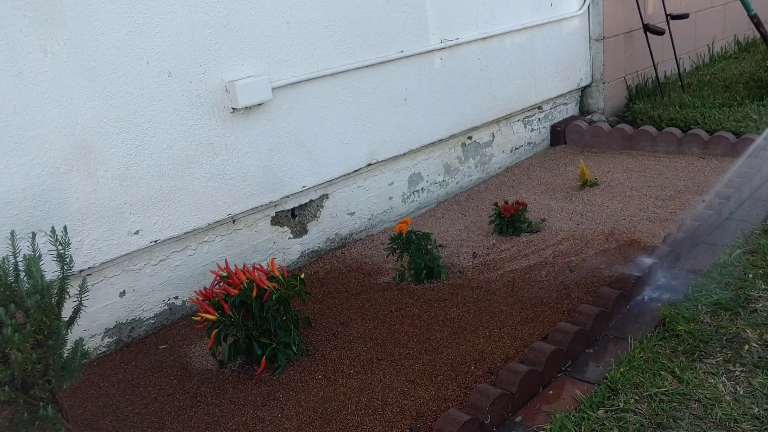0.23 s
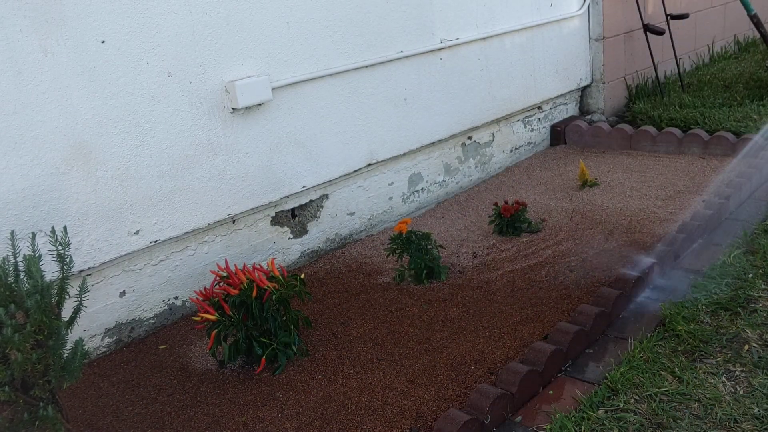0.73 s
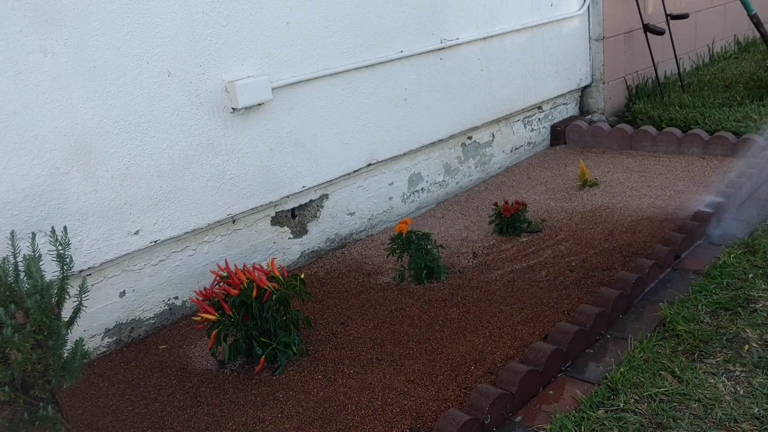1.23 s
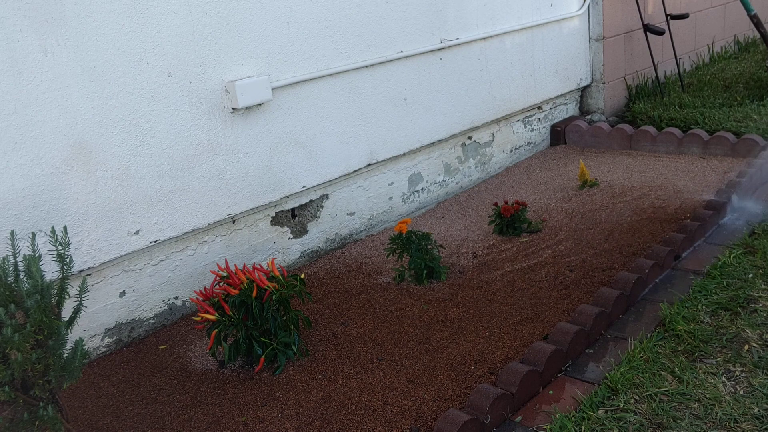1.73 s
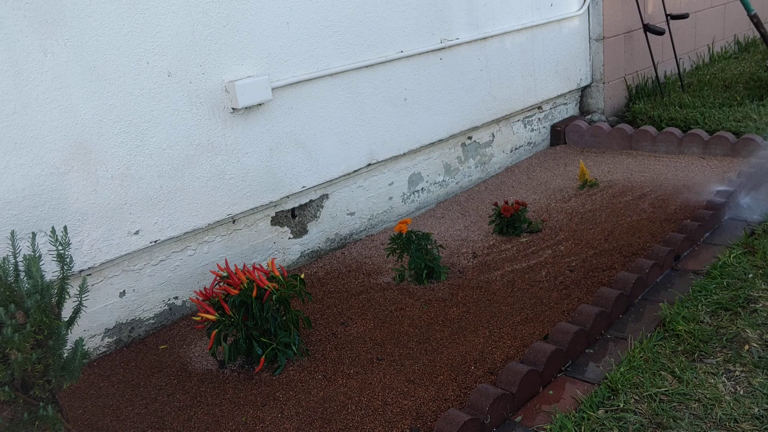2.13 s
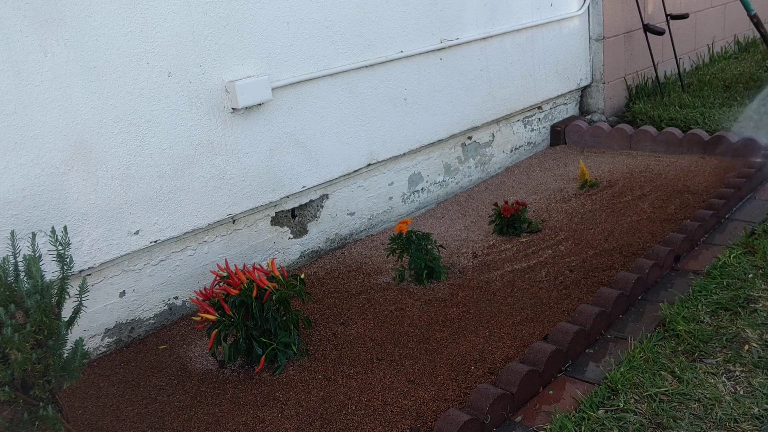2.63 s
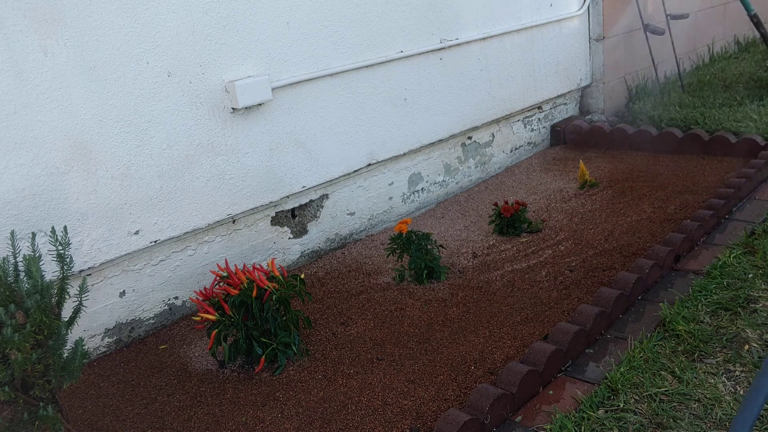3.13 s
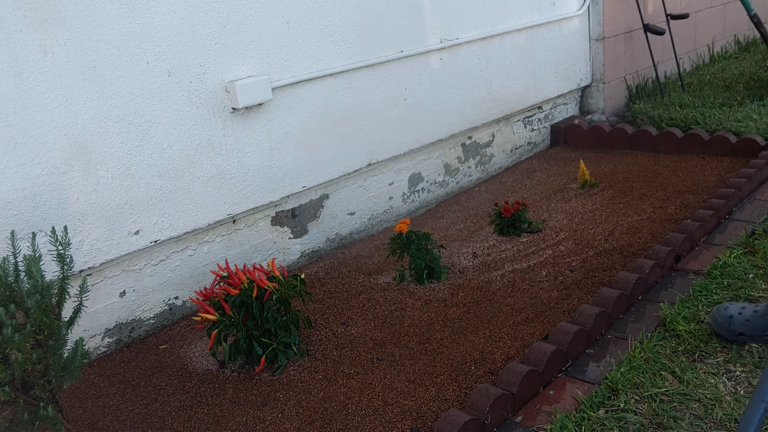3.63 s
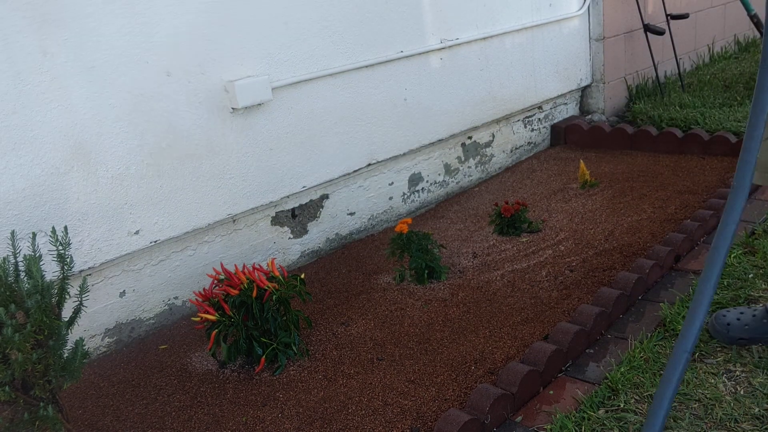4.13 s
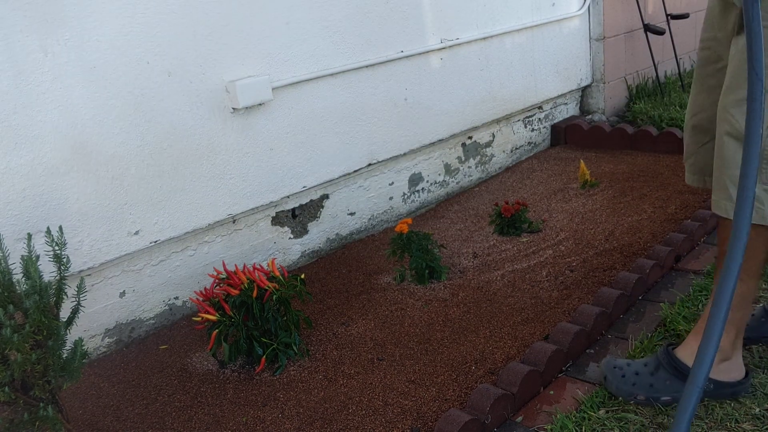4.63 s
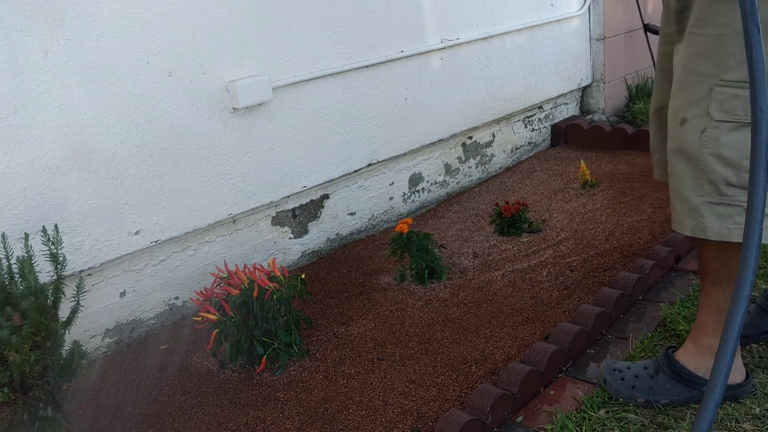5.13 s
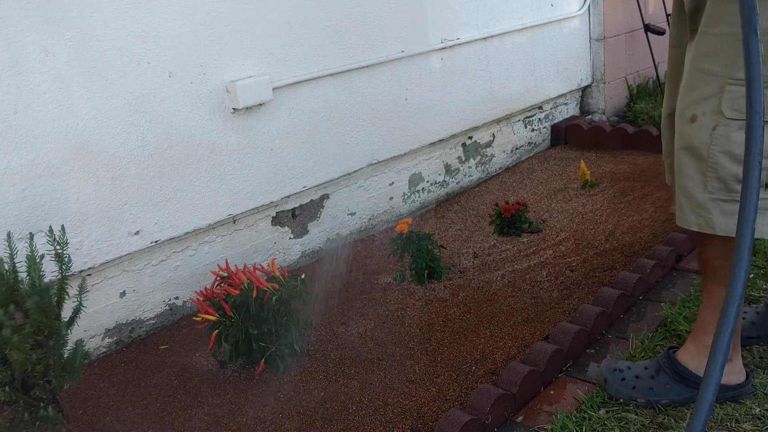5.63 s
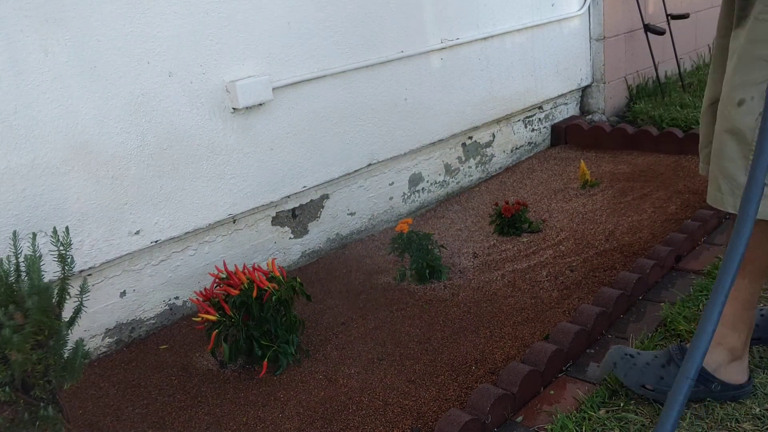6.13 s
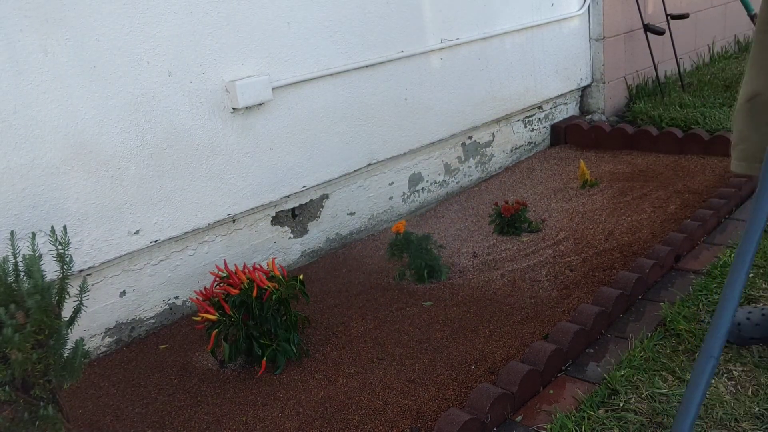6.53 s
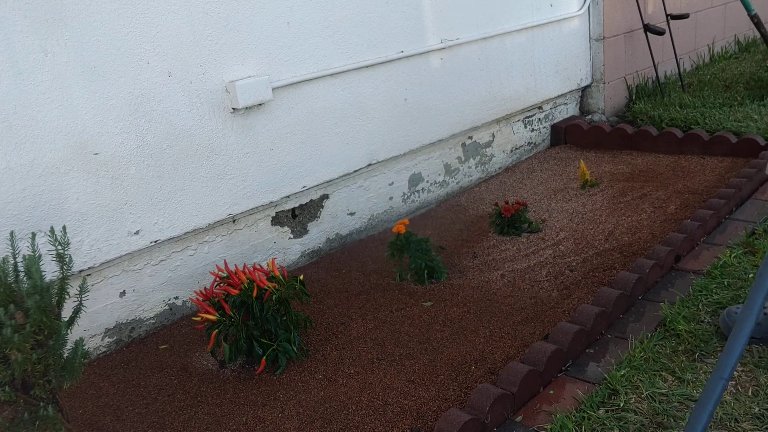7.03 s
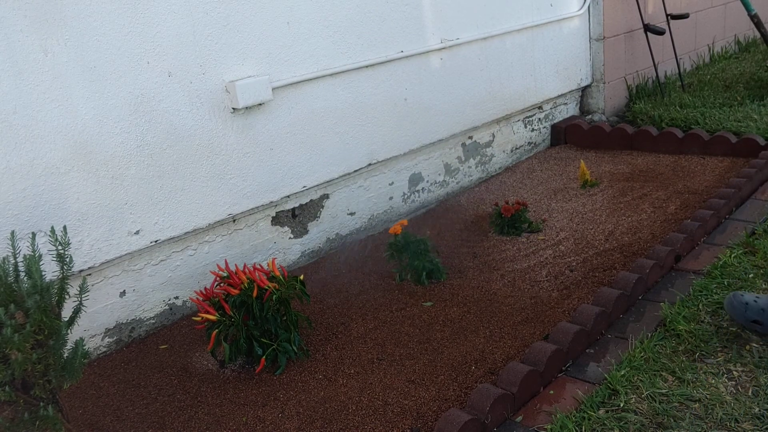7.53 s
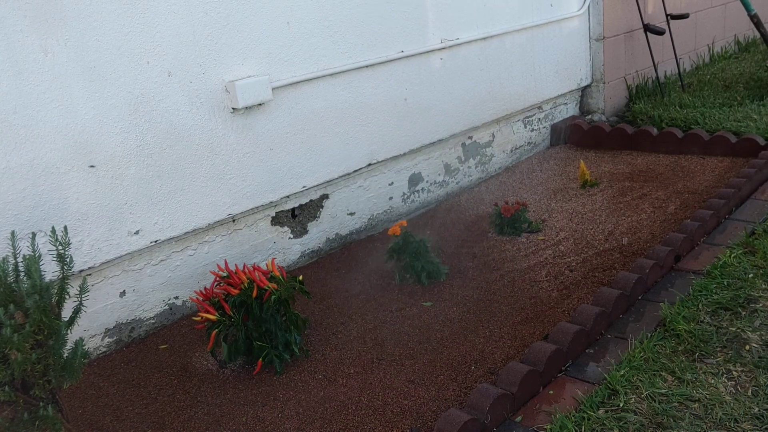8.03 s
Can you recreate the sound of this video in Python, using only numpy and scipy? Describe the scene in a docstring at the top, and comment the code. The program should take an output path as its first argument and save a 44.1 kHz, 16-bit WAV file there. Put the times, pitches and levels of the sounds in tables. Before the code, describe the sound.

A garden hose sprays fine water over a mulched bed beside a house wall, heard by a fixed stereo microphone. From 0 to 2.5 seconds the bright, grainy hiss is close and strongest on the right, surging unevenly; fat drops smack crisply around 1.1, 1.9 and 2.5. It falls away and is faintest near 3.2. At about 3.5 softer spray returns, with quick leaf patters until 4.1, and at 3.7 one wet footstep makes a dull thud and two tiny rising plops. The wider, diffuse spray leans left around 4.6 to 5.2, swells near 5.7, then settles near centre, with more leaf drumming and small drop taps around 6.7 to 7.4 and a last patter at 8. Throughout, a distant engine drones near 70 hertz over low street rumble, fuller and raspier from 4.2 to 7, then slowing and dropping slightly in pitch to the end at 8.3.

```python
"""Garden hose on mulch

A hose sprays fine water over a mulched bed beside a house wall: clicks of random drops over a smooth hiss.
The jet starts close on the right, swings away, sweeps to the left and comes back, drumming on leaves.
Fat drops smack as short noise bursts, and the gardener steps once: a thud with two ringing air pockets.
A far engine drones in overtones over a street rumble of filtered noise. Two microphone ports colour it all.
"""
import sys
import numpy as np
from scipy import signal
from scipy.fft import rfft, irfft, next_fast_len
from scipy.io import wavfile
from scipy.ndimage import uniform_filter1d, map_coordinates

SR = 44100
rng = np.random.default_rng(int(sys.argv[2]) if len(sys.argv) > 2 else 0)


def dump_mix(stems):
    """Bounce the given channels to the path in sys.argv[1] as a 16-bit WAV at rate SR."""
    frames = np.atleast_2d(stems).T  # one column per channel
    limited = np.clip(frames, -1, 1)  # hard clip at full scale
    pcm = np.round(limited * 32767).astype(np.int16)
    wavfile.write(sys.argv[1], SR, pcm)


N = 366030
TIME = np.arange(N) / SR

# Leads count how many samples earlier the right port hears a sound; a negative lead favours the left.
# The spray, louder as the jet lands nearer or on the stone edging: time_s, level_db
SPRAY_LEVEL = [(0, -45), (.2, -38.5), (.38, -39.5), (.55, -41), (.77, -38), (1.08, -40.5), (1.29, -46.5),
               (1.64, -39), (1.85, -44.5), (2.38, -40.5), (2.56, -49), (2.7, -49.5), (2.79, -50),
               (2.98, -58.5), (3.28, -61), (3.5, -50), (3.85, -51.5), (4.0, -50), (4.65, -53),
               (4.97, -49.5), (5.76, -46.5), (5.95, -51.5), (6.08, -49), (6.43, -49.5), (6.66, -54),
               (6.79, -51), (6.9, -51.5), (7.28, -52.5), (8.03, -50), (8.21, -54.5), (8.3, -50)]
# Where the jet lands: time_s, lead_samples, direct_share (0-1, before it is adjusted for pitch),
# splash_body_db (extra wet splash), splash_centre_hz
JET_AIM = [(0, 8, 0.95, 1, 4200), (.9, 8, 1, 2, 4300), (1.3, 9, 1, 1, 4300), (2.7, 11, 0.92, -1, 3700),
           (3.1, 7.5, 0.16, 7, 3300), (3.95, -4.5, 0.6, 2.5, 3080), (4.6, -11.5, 0.3, 6, 3996),
           (5.15, -10, 0.2, 2, 4300), (5.7, -4.5, 0.15, 2.5, 4470), (6.4, -1.5, 0.5, 2.5, 3600),
           (7.4, -1, 0.54, 3.5, 3199), (8.3, -2, 0.16, 3, 3700)]
# Tone colour of spray on mulch: frequency_hz, relative_level_db (per Hz)
MULCH_COLOUR = [(200, -20), (700, -3.5), (1500, -3.5), (4500, 5.5), (7000, 1.5), (10000, -1), (15500, -2.5)]
# The jet crosses leaves: centre_s, level_db (before a 2.5 dB cut), half_length_s, centre_hz, width_octaves
LEAF_PATTERS = [(2.78, -51.5, 0.016, 4200, 0.58), (3.368, -49.5, 0.036, 4370, 0.77),
                (3.502, -48, 0.017, 5530, 0.9), (3.688, -55, 0.02, 3630, 0.21),
                (3.77, -50.5, 0.01, 5300, 0.24), (3.972, -43.5, 0.04, 4050, 0.71),
                (4.069, -45.5, 0.028, 2500, .28), (4.983, -49.5, 0.029, 4800, 0.53),
                (5.47, -48.5, .026, 6414, 0.72), (5.746, -52, 0.024, 3997, 0.58),
                (6.27, -52, 0.01, 2625, .3), (6.794, -48, 0.034, 3720, 0.26), (6.8, -52.5, .03, 6800, 0.37),
                (7.089, -46.5, 0.019, 3700, 0.74), (7.137, -44, 0.02, 2903, 0.36),
                (7.188, -46, 0.025, 3400, 0.52), (7.359, -44, 0.012, 3500, 0.52),
                (7.84, -54, .025, 3683, 0.57), (8.017, -53.5, 0.034, 4513, 0.62)]
# Fat drops smack on the edging and on leaves: start_s, level_db, centre_hz, width_octaves,
# t60_s (time to fade by 60 dB), lead_samples
DROP_KNOCKS = [(1.0635, -31.5, 6900, 0.4, .025, 12), (1.091, -30, 4370, 0.22, 0.017, 6.5),
               (1.942, -24, 8060, 0.7, 0.003, 9), (2.538, -39, 7000, 0.42, 0.014, 13),
               (2.760, -46, 7320, .4, .014, 12), (2.7821, -41, 7600, 0.79, 0.018, 11),
               (3.4795, -43, 7000, .45, .015, 4), (3.7539, -45, 6000, .5, .02, 2),
               (3.935, -43, 7000, .45, .018, -1), (5.9728, -55, 7010, 0.43, .012, -5),
               (6.7136, -43, 4190, .35, .012, -1), (7.1259, -40, 3225, .25, 0.022, -1),
               (7.3405, -37.5, 5590, 0.3, 0.019, -2)]
# Air pockets plop under the wet sole: start_s, level_db, first_pitch_hz, last_pitch_hz, t60_s
SOLE_PLOPS = [(3.6744, -32, 480, 1300, .024), (3.686, -38, 950, 1278, 0.065)]
# A far engine runs evenly, then slows: time_s, firing_rate_hz, firing_tone_db
ENGINE_SPEED = [(0, 69.9, -39), (.22, 70.45, -37.5), (.5, 70.14, -44.5), (1.1, 70.35, -42.5),
                (1.3, 70.3, -41), (2.03, 70.4, -39.5), (2.42, 70.9, -46), (2.62, 70.8, -53),
                (2.85, 70.65, -40), (3.15, 69.95, -48.5), (3.45, 70, -41.5), (3.8, 69.8, -45),
                (4.35, 70.04, -37.5), (4.8, 70.27, -42.5), (5.4, 69.88, -39), (6.6, 69.8, -41.5),
                (7.05, 68.8, -43.5), (7.45, 66.26, -39), (8.3, 64.05, -44)]
# How hard the engine works: time_s, load (0 idle, about 1 full)
ENGINE_LOAD = [(0, 0.018), (1.0, 0.37), (3.7, 0.14), (4.25, 1.16), (5.4, 0.83), (6.0, 0.9), (7.1, 0.71),
               (7.7, 0.0071), (8.3, 0.085)]
# Overtones of the firing rate: multiple, idle_db, full_load_db, slowing_gain_db (per Hz of slowing)
ENGINE_OVERTONES = [(2, -62.5, -49.5, 0.5), (3, -57, -51, -3), (4, -67, -60, -0.8), (5, -74, -60, 2)]
# Overtones near a pitch swell briefly: centre_s, half_length_s, centre_hz, swell_db (at that pitch)
HUM_SWELLS = [(1.0, 0.13, 140, 7.5), (1.81, 0.16, 205.7, 3.5), (2.42, 0.2, 267, 11.5), (4.05, 0.16, 205, 4),
              (6.1, 0.19, 139.9, 3)]
# Tone colour of the street rumble: frequency_hz, relative_level_db (per Hz)
STREET_COLOUR = [(12, -1), (22, 2.5), (31, 2), (41, -1), (52, 1), (95, 0.5), (165, -9), (230, -12.5),
                 (320, -13.5), (450, -19), (620, -18), (760, -14), (950, -20.5), (1300, -22.5),
                 (1700, -24.5), (5000, -46), (15000, -41)]
# How alike the street sounds left and right: frequency_hz, likeness (0-1)
STREET_SAMENESS = [(20, 0.66), (150, 0.99), (280, 0.66), (500, 0.65), (750, 0.23), (1200, 0.064),
                   (4000, 0.072)]
# A low boom swells and fades in the traffic: time_s, level_db
BOOM_LEVEL = [(0, -47), (.9, -52.5), (2.05, -46), (2.5, -57), (3.8, -49.5), (5.1, -69), (7.15, -50.5),
              (7.8, -64), (8.3, -57)]
# A second, fainter hum comes and goes: time_s, level_db
FAINT_HUM_LEVEL = [(0, -70), (3.9, -74), (4.3, -62), (6.3, -62.5), (6.85, -55), (7.2, -69), (8.3, -63)]
# Colour of the left microphone port: frequency_hz, gain_db
LEFT_PORT_COLOUR = [(100, -0.24), (300, -1.14), (1200, -0.8), (1900, -0.5), (4000, 5.5), (5200, 5.5),
                    (6000, 6), (7000, 2), (8000, 2.5), (10000, 2), (15500, 4.5)]
# Colour of the right microphone port: frequency_hz, gain_db
RIGHT_PORT_COLOUR = [(100, -2), (300, -2.5), (1700, -2), (4200, 0.5), (5000, 3.5), (6000, 10), (6500, 16.5),
                     (6900, 20), (7300, 18), (8000, 13), (9000, 11), (11000, 7.5), (15500, 3.5)]

# Left minus right level of the spray: with the jet straight ahead, and its change with the lead
SHADE_AHEAD_DB, SHADE_DB_PER_SAMPLE = -0.7, -0.37
SWAY_HZ = 4.0  # how fast the hand sways the jet
PATCH_DB = 1.4  # how strongly the clumps of water differ in colour
FRAME, HOP = 512, 128  # short-time spectrum (samples)
RASP_IDLE_DB, RASP_LOADED_DB = -72, -57.5  # rasp of the exhaust gas
STREET_DB, STREET_RISE_DB_PER_S = -45, 0.3261  # the rumble creeps up
EDGE_HZ = 15600  # upper limit of the sound


def gain_of(db):
    """Turns decibels into a factor."""
    return 10 ** (np.asarray(db) / 20)


def evened(x):
    """Scales a sound to an average (rms) level of one."""
    return x / np.sqrt(np.mean(x ** 2) + 1e-20)


def read(points, hz):
    """Reads a spectrum table, joined by straight lines over log frequency."""
    f, value = np.transpose(points)
    return np.interp(np.log(hz + 1), np.log(f + 1), value)


def follow(rows, t=TIME):
    """Reads the columns of a time table at the times t."""
    s, *columns = np.transpose(rows)
    return [np.interp(t, s, c) for c in columns]


def coloured(x, gain):
    """Filters a sound by a gain that depends on frequency."""
    size = next_fast_len(x.shape[-1] + 2048)
    spectrum = rfft(x, size) * gain(np.fft.rfftfreq(size, 1 / SR))
    return irfft(spectrum, size)[..., :x.shape[-1]]


def hump(hz, centre_hz, octaves):
    """A bell shape over log frequency."""
    return np.exp(-.5 * (np.log2((hz + 1) / centre_hz) / octaves) ** 2)


def wander(rate_hz):
    """A slow random drift with an rms of one."""
    return evened(coloured(rng.standard_normal(N), lambda hz: np.exp(-(hz / rate_hz) ** 2)))


def add(mix, s, sound):
    """Mixes in a stereo sound that starts at time s."""
    part = mix[:, max(round(s * SR), 0):][:, :sound.shape[1]]
    part += sound[:, :part.shape[1]]


def at_ports(x, lead):
    """A sound from one side reaches one port a few samples before the other."""
    n = np.arange(len(x))
    return np.array([map_coordinates(x, [n + side * lead / 2], order=5) for side in (-1, 1)])


def drops(size, per_s, spread_db, mist):
    """Tiny random impacts over the smooth hiss of mist; spread_db makes their strengths uneven."""
    strength = gain_of(spread_db * np.minimum(rng.exponential(1, size), 5.5))
    falls_now = rng.random(size) < per_s / SR
    clicks = strength * rng.choice([-1, 1], size) * falls_now
    return evened(evened(clicks) + mist * rng.standard_normal(size))


def spray(sway_db=0.66, flutter_db=0.79, wall_db=-6.0, wall_close_db=-8.0,
          blur_hz=6340.0, scatter_hz=3961.0, mist_hz=12200.0, mist_lag=0.4):
    """Drops land under the jet, some strike the wall on the other side, and strays fall all around."""
    jet, wall = (drops(N, per_s=5500, spread_db=2.5, mist=0.84) for place in range(2))
    strays = np.array([drops(N, per_s=4500, spread_db=1.0, mist=1.0) for port in range(2)])
    lead, closeness = follow(JET_AIM)[:2]
    # the wall is heard less while the jet lands close by
    wall_gain = gain_of(wall_db + wall_close_db * closeness)
    aimed = at_ports(jet, lead) + wall_gain * at_ports(wall, -lead)
    aimed = aimed / np.sqrt(1 + wall_gain ** 2)

    hz, t, (near, around) = signal.stft([aimed, strays], SR, nperseg=FRAME, noverlap=FRAME - HOP)
    hz = hz[:, None]
    direct, body_db, splash_hz = follow(JET_AIM, t)[1:]
    # the wet patch is wide, so short waves lose their direction
    direct = np.clip(direct, 0, 1) ** (hz / scatter_hz)
    direct = direct / np.sqrt(1 + np.square(hz / blur_hz) ** 2)
    water = np.sqrt(direct) * near + np.sqrt(1 - direct) * around

    # the jet breaks into clumps, each with a colour of its own
    patches = uniform_filter1d(rng.standard_normal((len(t), len(hz))), size=10, axis=0)
    patches = evened(uniform_filter1d(patches, size=7, axis=1))
    # the hand sways the jet
    spray_db = follow(SPRAY_LEVEL)[0] + sway_db * wander(SWAY_HZ)
    # the finest mist hangs in the air and follows quick surges less
    jet_db = np.interp(t, TIME, spray_db)
    surge_db = jet_db - uniform_filter1d(jet_db, size=170)
    hang_db = -mist_lag * surge_db * hump(hz, mist_hz, 0.25)
    splash_db = body_db * hump(hz, splash_hz, 1.0)
    water *= gain_of(read(MULCH_COLOUR, hz) + splash_db + PATCH_DB * patches.T + hang_db)
    water = evened(signal.istft(water, nperseg=FRAME, noverlap=FRAME - HOP)[1][:, :N])

    # the balance between the ports follows the jet from side to side
    shade_db = np.array([[.75], [-.25]]) * (SHADE_AHEAD_DB + SHADE_DB_PER_SAMPLE * lead)
    return water * gain_of(spray_db + flutter_db * wander(24.0) + shade_db)


def leaves(scatter=0.38, clump_db=0.3):
    """Sparser drops drum on foliage in clumps as the jet passes over it."""
    out, clumps = np.zeros((2, N)), gain_of(clump_db * wander(42))
    t = np.arange(-SR // 5, SR // 5) / SR
    for s, db, half_s, centre_hz, octaves in LEAF_PATTERS:
        lead = follow(JET_AIM, s)[0]
        hit, *around = (drops(len(t), per_s=1100, spread_db=0.0, mist=0.53) for path in range(3))
        patter = at_ports(hit, lead) + scatter * np.array(around)
        patter = evened(coloured(patter, lambda hz: hump(hz, centre_hz, octaves)))
        swell = np.exp(-.5 * (t / half_s) ** 2)
        add(out, s + t[0], gain_of(db - 2.5) * patter * swell)
    return out * clumps


def knocks(rise_share=0.064, scatter=1.0):
    """Fat drops strike as noise with a quick rise and no ring; longer blows start more slowly."""
    out, t = np.zeros((2, N)), np.arange(SR // 4) / SR
    for s, db, centre_hz, octaves, t60, lead in DROP_KNOCKS:
        noise = at_ports(rng.standard_normal(len(t)), lead)
        noise = noise + scatter * rng.standard_normal((2, len(t)))
        blow = evened(coloured(noise, lambda hz: hump(hz, centre_hz, octaves)))
        rise = 1 - np.exp(-t / (rise_share * t60))
        add(out, s, blow * gain_of(db - 60 * t / t60) * rise)
    return out


def footstep(rise_s=0.00048, glide_s=0.0015, lead=9.7,
             thud_db=-42.0, thud_hz=563.0, thud_octaves=0.97, thud_t60=.13):
    """The sole thuds on wet ground; each air pocket rings, its pitch leaping up as it shrinks."""
    out, t = np.zeros((2, N)), np.arange(SR // 8) / SR
    rise = 1 - np.exp(-t / rise_s)
    thud = evened(coloured(rng.standard_normal(len(t)), lambda hz: hump(hz, thud_hz, thud_octaves)))
    thud = thud * rise * gain_of(thud_db - 60 * t / thud_t60)
    add(out, SOLE_PLOPS[0][0], at_ports(thud, lead))
    for s, db, from_hz, to_hz, t60 in SOLE_PLOPS:
        hz = to_hz + (from_hz - to_hz) * np.exp(-t / glide_s)
        ring = np.sin(2 * np.pi * np.cumsum(hz) / SR)
        add(out, s, at_ports(ring * rise * gain_of(db - 60 * t / t60), lead))
    return out


def engine(waver_db=1.0, overtone_waver_db=1.5, lead=12.0, rasp_hz=400.0, swell_octaves=0.25):
    """A far exhaust: a firing tone, overtones that change with load and waver in the air, and a gas rasp."""
    hz, firing_db = follow(ENGINE_SPEED)
    load, = follow(ENGINE_LOAD)
    unsteady_hz = hz * (1 + 0.0022 * wander(3.5))
    angle = 2 * np.pi * np.cumsum(unsteady_hz) / SR
    drone = gain_of(firing_db + waver_db * wander(4.6)) * np.cos(angle)
    # as the engine slows, each overtone slides onto or off a resonance of the pipe
    slowing_hz = hz.max() - hz
    for k, idle_db, loaded_db, db_per_hz in ENGINE_OVERTONES:
        db = idle_db + load * (loaded_db - idle_db) + db_per_hz * slowing_hz
        for s, half_s, centre_hz, swell_db in HUM_SWELLS:
            nearness = hump(k * hz.max(), centre_hz, swell_octaves)
            db = db + swell_db * nearness * np.exp(-.5 * ((TIME - s) / half_s) ** 2)
        drone += gain_of(db + overtone_waver_db * wander(7.5)) * np.cos(k * angle)
    # the rasp puffs with each firing and grows with load
    puffs = rng.standard_normal((2, N)) * (1 + 0.33 * np.cos(angle))
    rasp = evened(coloured(puffs, lambda f: hump(f, rasp_hz, 0.85)))
    rasp_db = RASP_IDLE_DB + load * (RASP_LOADED_DB - RASP_IDLE_DB)
    # the root of two makes the tone levels rms levels
    return at_ports(np.sqrt(2) * drone, lead) + gain_of(rasp_db) * rasp


def street(lead=9.5):
    """Far traffic: noise that is most alike in both ports in the bass and diffuse higher up."""
    def likeness(hz):
        """Share of the sound that both ports have in common."""
        return np.clip(read(STREET_SAMENESS, hz), 0, 1)
    shared = coloured(at_ports(rng.standard_normal(N), lead), lambda hz: np.sqrt(likeness(hz)))
    apart = coloured(rng.standard_normal((2, N)), lambda hz: np.sqrt(1 - likeness(hz)))
    rumble = evened(coloured(shared + apart, lambda hz: gain_of(read(STREET_COLOUR, hz))))
    return rumble * gain_of(STREET_DB + STREET_RISE_DB_PER_S * TIME)


def narrow_band(levels, centre_hz, octaves):
    """A narrow band of traffic noise, unsteady because so few frequencies beat together."""
    db, = follow(levels)
    return gain_of(db) * evened(coloured(rng.standard_normal(N), lambda hz: hump(hz, centre_hz, octaves)))


def causal(db):
    """Gain and phase of a cavity with this spectrum: it leads below a resonance and lags above it."""
    log_gain = np.log(gain_of(db))
    # mirror the spectrum into a full circle of frequencies
    circle = np.concatenate([log_gain, log_gain[-2:0:-1]])
    return np.exp(np.conj(signal.hilbert(circle)))[:len(db)]


def scene():
    """Mixes the water, the footstep and the neighbourhood."""
    water = spray() + leaves() + knocks()
    boom = narrow_band(BOOM_LEVEL, centre_hz=126.0, octaves=0.092)
    faint_hum = narrow_band(FAINT_HUM_LEVEL, centre_hz=309.5, octaves=0.019)
    return water + footstep() + engine() + street() + boom + faint_hum


def record(dry):
    """Each port rings with its own resonance, which also shifts its phase; then the treble is cut off."""
    def ports(hz):
        """Response of the left and right port."""
        return np.array([causal(read(port, hz)) for port in (LEFT_PORT_COLOUR, RIGHT_PORT_COLOUR)])
    heard = coloured(dry, ports)
    low_pass = signal.firwin(1023, EDGE_HZ, window=("kaiser", 9), fs=SR)
    return signal.oaconvolve(heard, low_pass[None], "same")


dry = scene()
out = record(dry)
dump_mix(out)
```